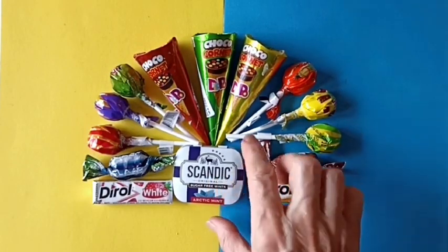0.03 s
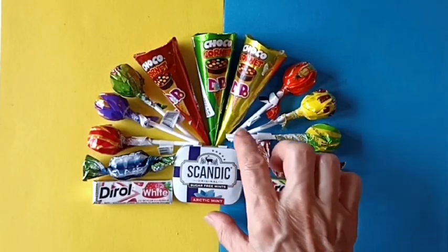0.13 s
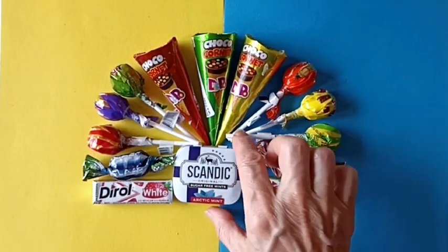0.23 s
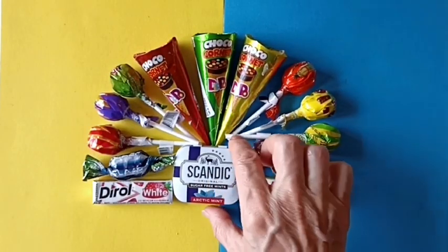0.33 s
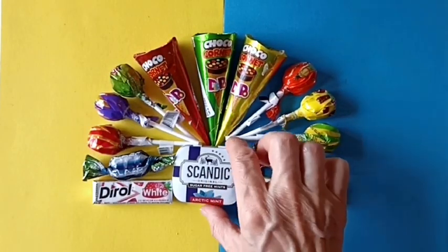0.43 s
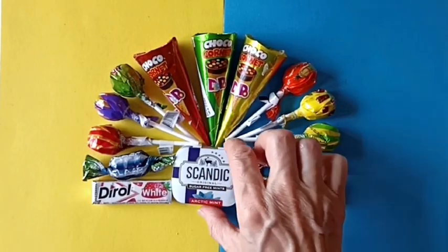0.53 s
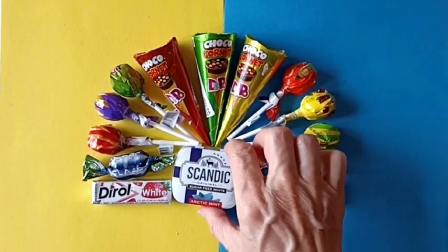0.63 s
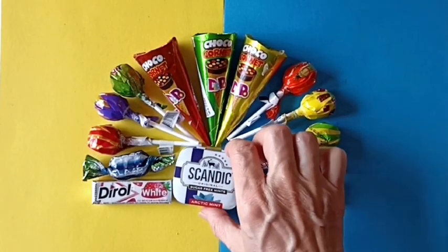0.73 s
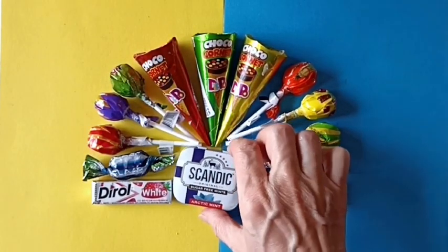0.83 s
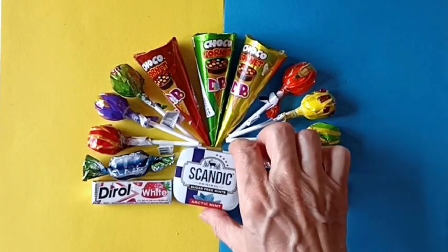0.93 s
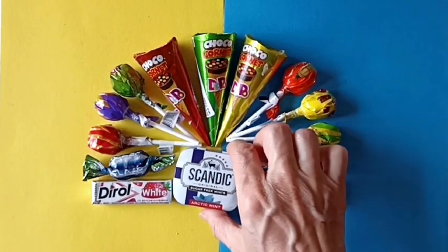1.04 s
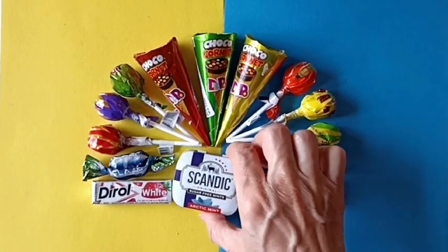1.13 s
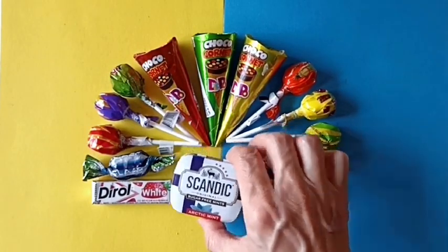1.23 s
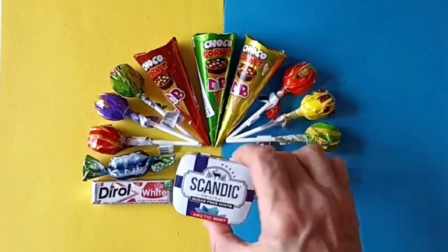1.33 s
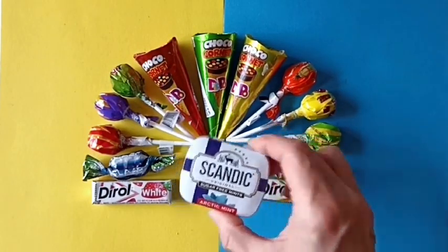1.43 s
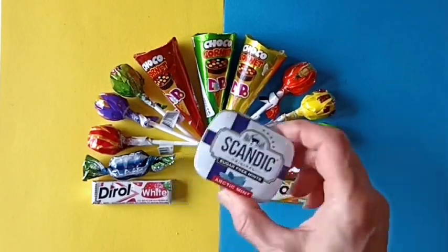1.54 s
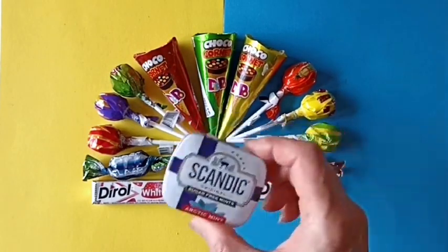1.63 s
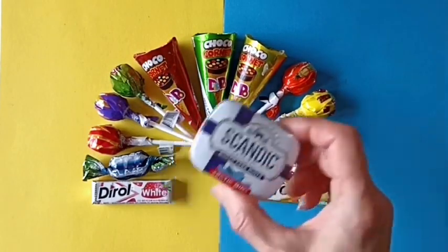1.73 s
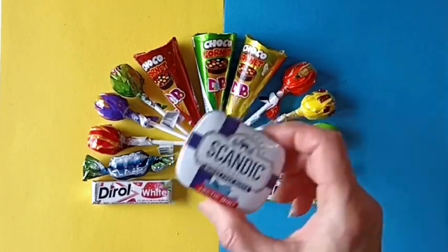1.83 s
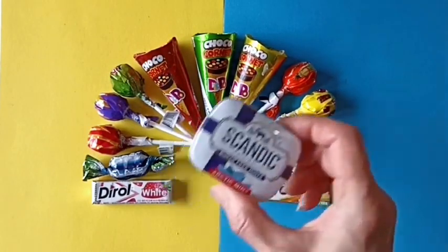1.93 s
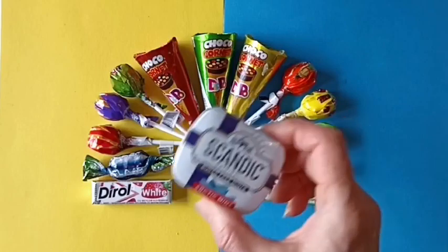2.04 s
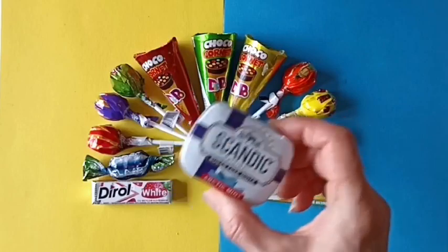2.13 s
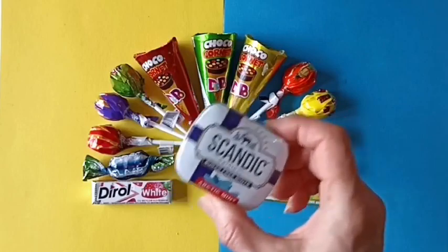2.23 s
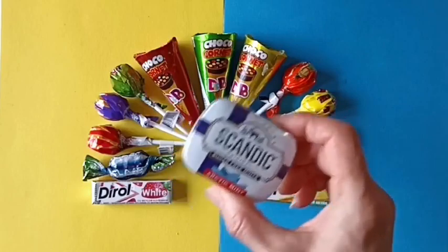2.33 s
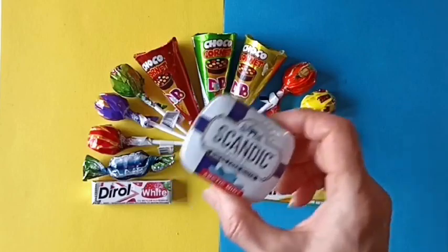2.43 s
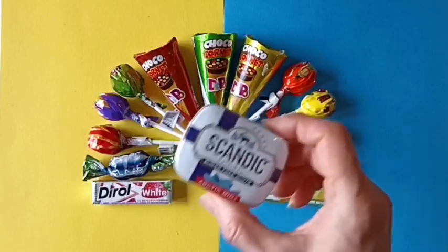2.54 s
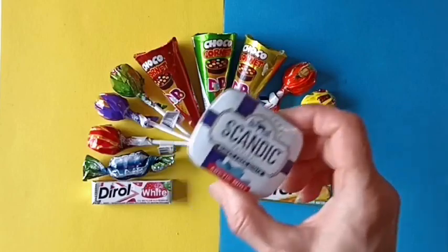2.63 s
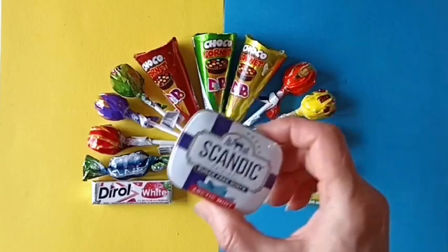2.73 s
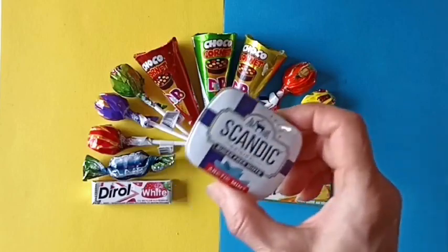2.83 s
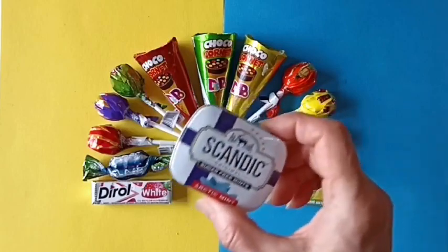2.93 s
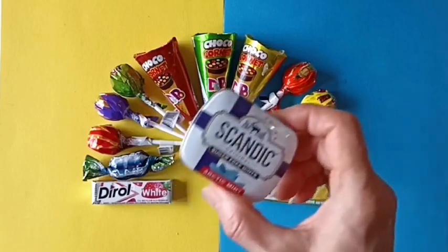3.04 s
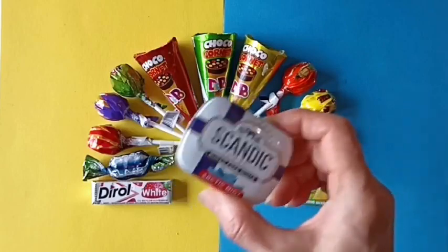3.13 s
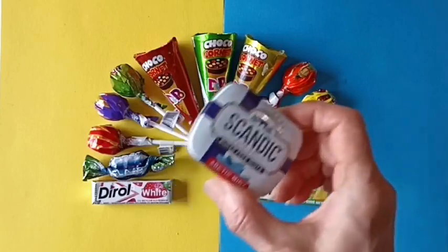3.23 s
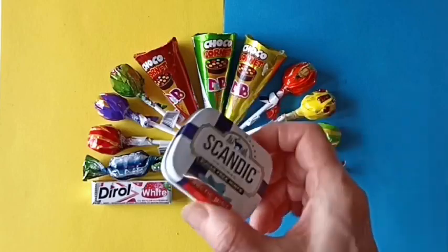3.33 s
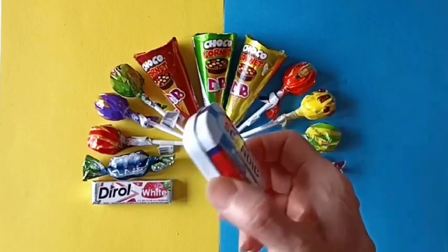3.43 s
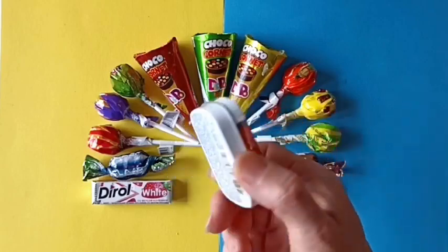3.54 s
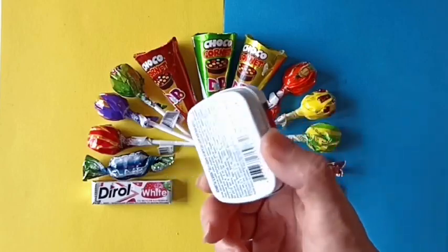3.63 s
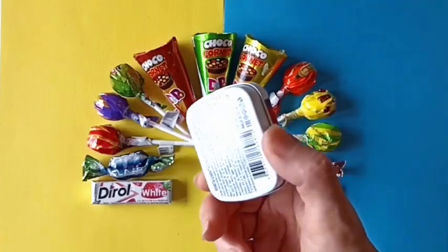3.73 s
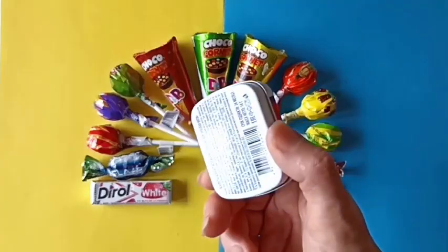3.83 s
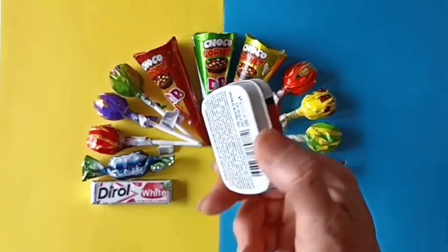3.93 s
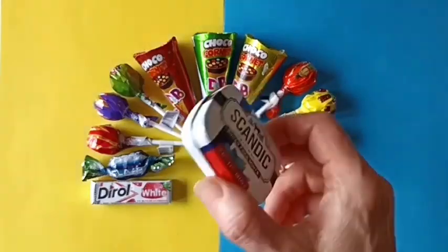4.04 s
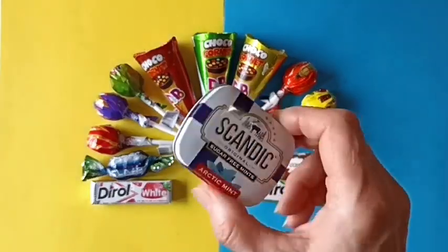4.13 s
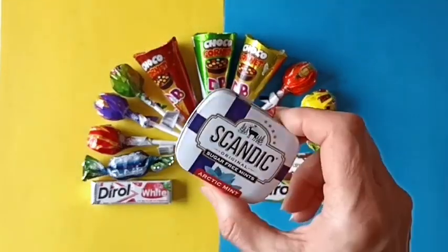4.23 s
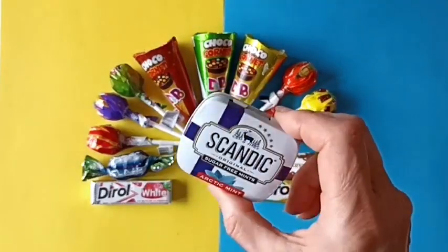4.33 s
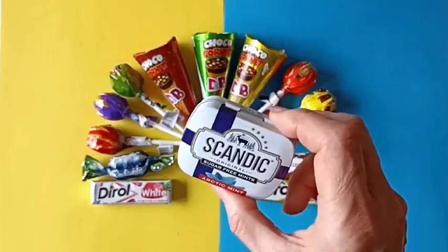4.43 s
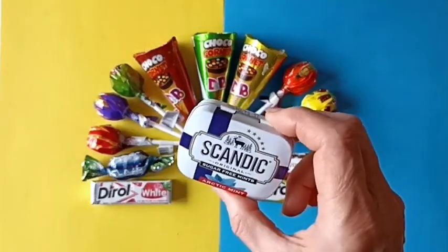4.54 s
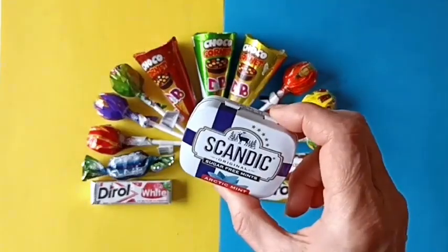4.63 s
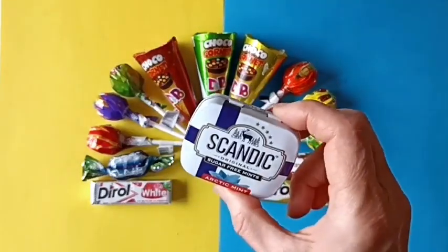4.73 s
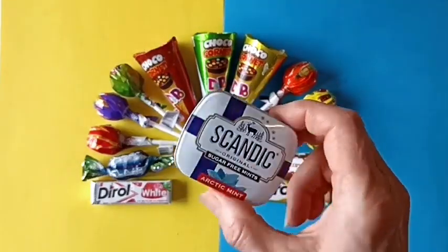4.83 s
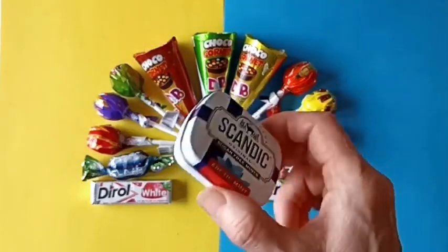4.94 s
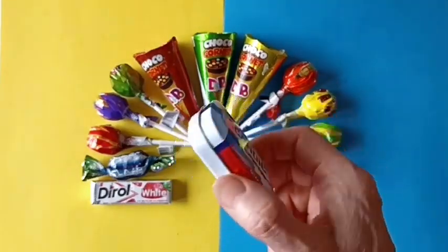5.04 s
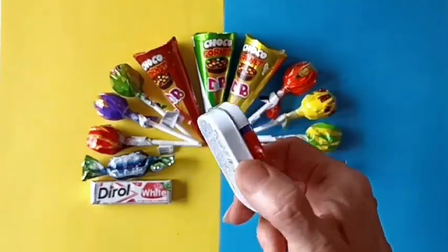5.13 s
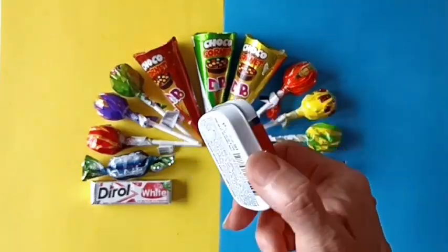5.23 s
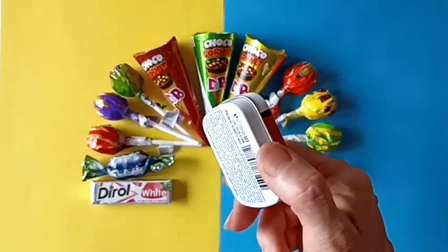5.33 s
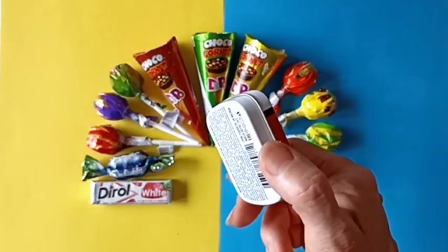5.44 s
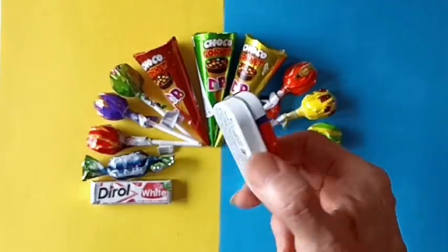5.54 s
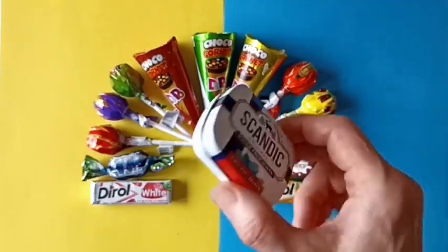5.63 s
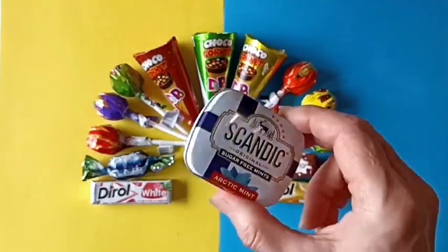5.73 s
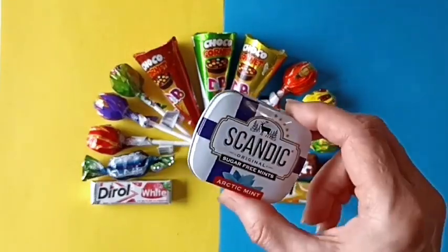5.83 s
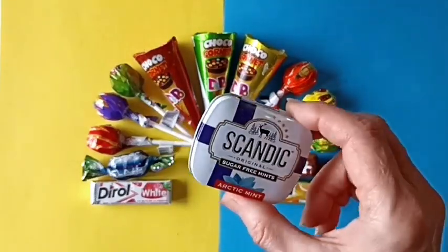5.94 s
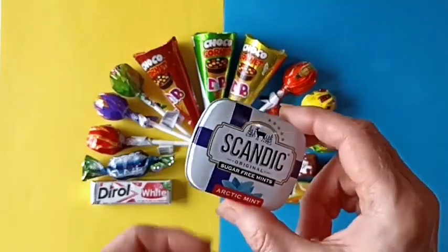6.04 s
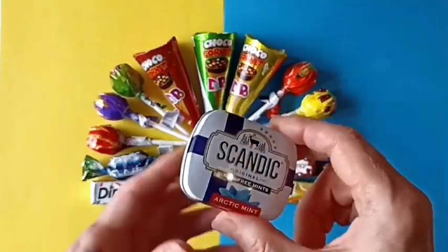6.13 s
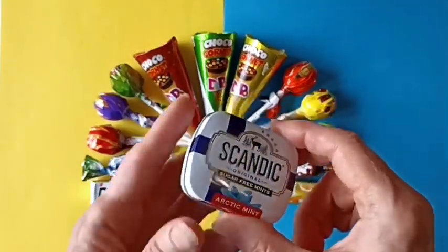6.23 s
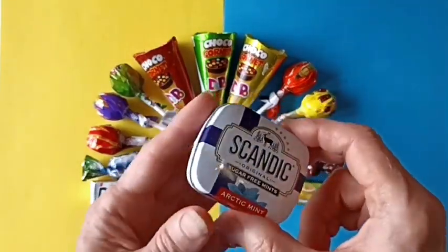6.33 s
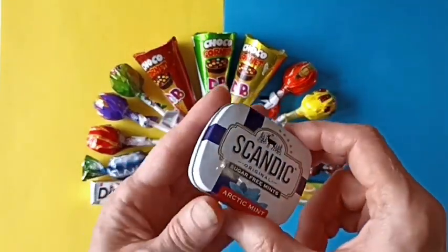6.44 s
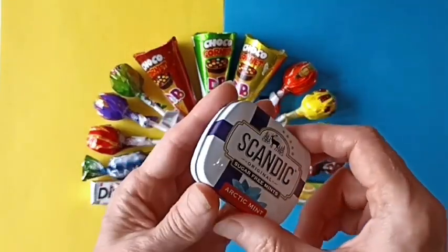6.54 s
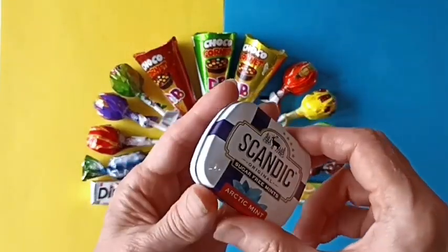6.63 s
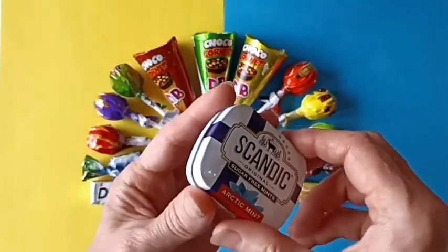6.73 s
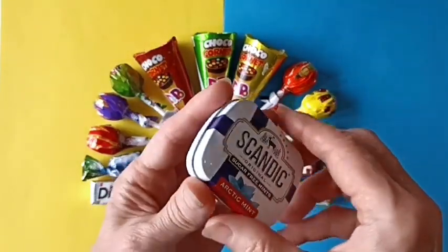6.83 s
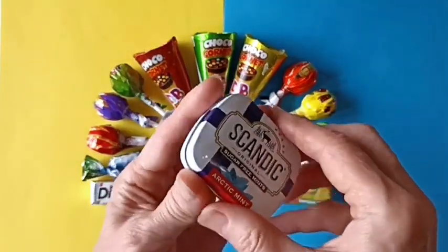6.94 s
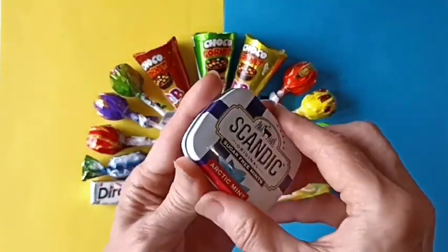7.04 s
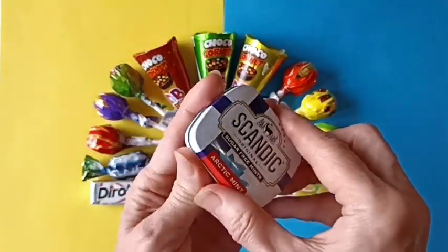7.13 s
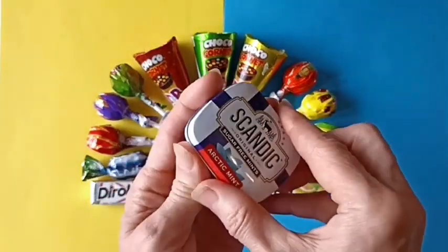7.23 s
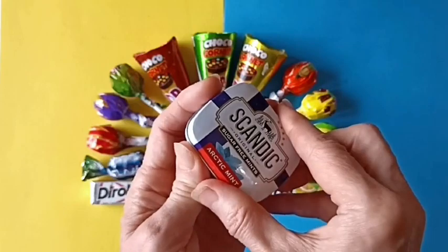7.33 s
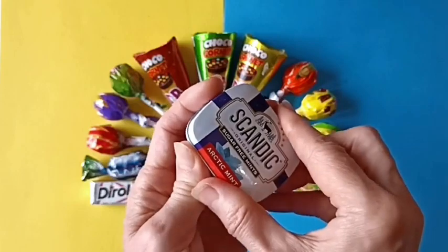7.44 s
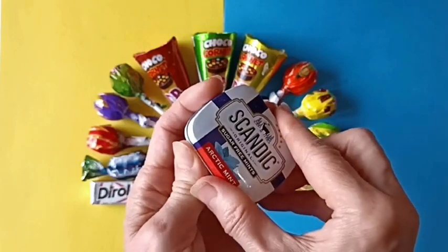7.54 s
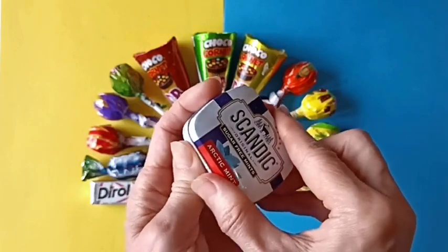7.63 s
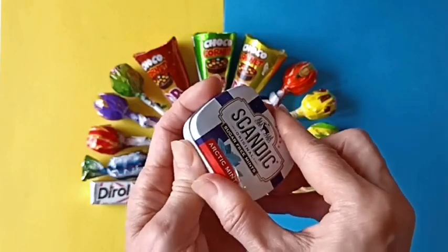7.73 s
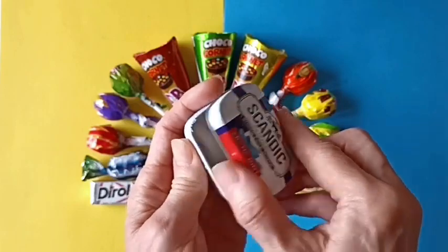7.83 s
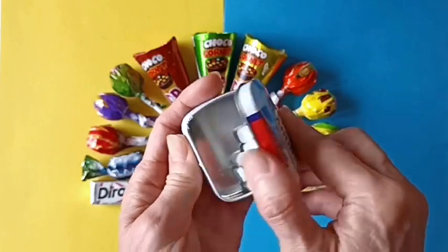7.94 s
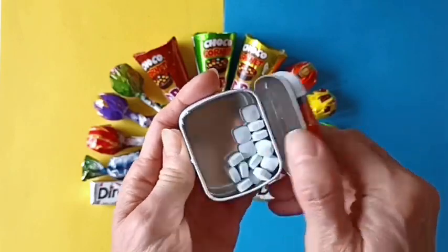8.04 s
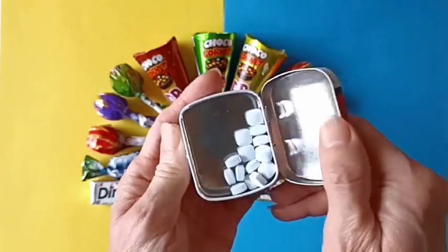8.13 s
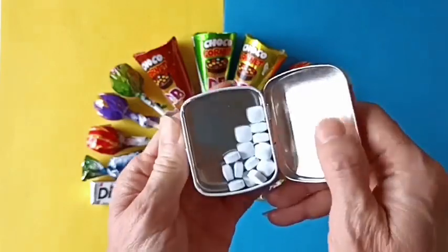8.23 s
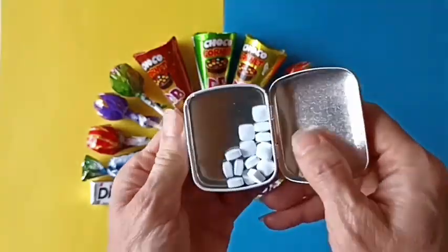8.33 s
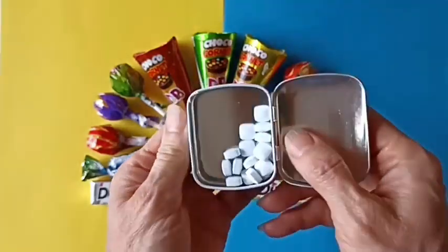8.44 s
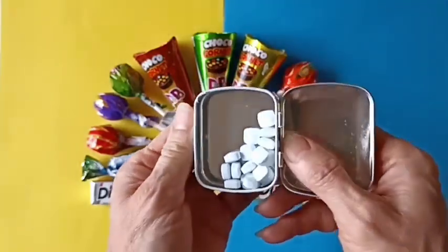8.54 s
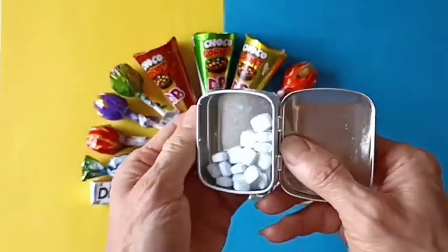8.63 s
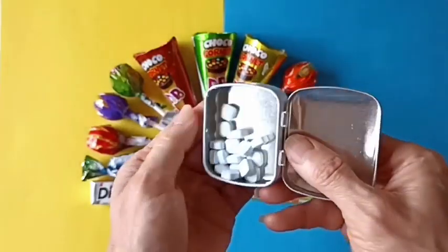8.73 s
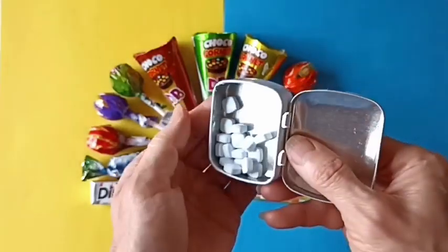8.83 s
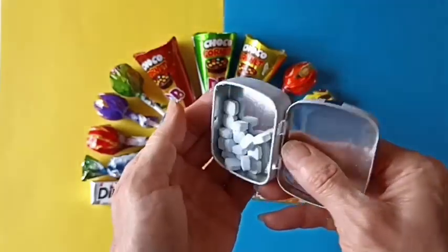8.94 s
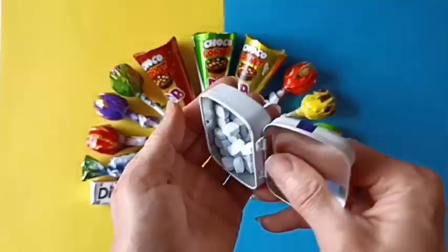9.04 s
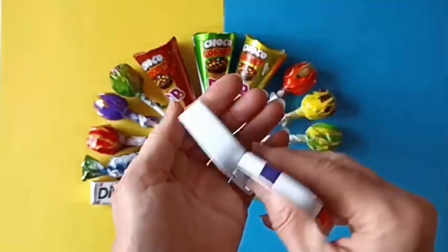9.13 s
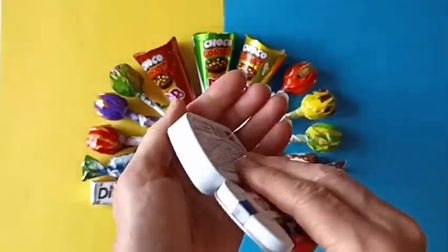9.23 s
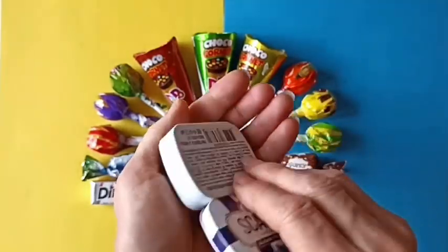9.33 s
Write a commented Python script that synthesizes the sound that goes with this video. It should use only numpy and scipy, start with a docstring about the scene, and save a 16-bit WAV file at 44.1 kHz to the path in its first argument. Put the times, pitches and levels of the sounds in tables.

```python
"""A tin of mints

A small tin of hard mints is lifted from a board, shaken, turned over, popped open and tipped.
Mints land in bunches, strike singly and slide between blows. Each impact excites the modes of the
sheet metal, whose pitch and damping depend on how the tin is held. The lid opens with a puff of air.
The sound reaches two close microphone ports, over the noise and hum of a quiet room."""
import sys
import numpy as np
from scipy import signal
from scipy.fft import rfft, irfft, next_fast_len
from scipy.io import wavfile
from scipy.ndimage import uniform_filter1d

SR = 44100
rng = np.random.default_rng(int(sys.argv[2]) if len(sys.argv) > 2 else 0)


def transcribe(u):
    """Save the signal u as a 16-bit wav file named by the first command-line argument.

    u: samples, shape (n,) or (channels, n), limited to [-1, 1]; the rate is SR.
    q: integer samples, one column per channel.
    """
    v = np.clip(np.atleast_2d(u).T, -1, 1)
    q = np.round(v * 32767).astype(np.int16)
    wavfile.write(sys.argv[1], SR, q)


N = 414540

AIR_SPECTRUM = [(25, -38), (50, -30.5), (95, -7.5), (260, -9), (400, -11.5), (750, -17.5), (1100, -21.5),
                (1600, -24), (4000, -30.5), (10500, -41), (12500, -32), (15500, -42)]  # room noise: f/Hz, relative density/dB
AIR_COHERENCE = [(30, 0.48), (400, 0.16), (8000, 0.074)]  # its likeness left and right: f/Hz, coherence
HUM_LINES = [(98, -81.5), (147, -75), (345, -81.5), (392, -78.5)]  # machine tones: f/Hz, level of the wavering part/dB
ROOM_DECAY = [(400, 0.35), (12000, 0.11)]  # reverberation time: f/Hz, T60/s
PORT_BALANCE = [(950, -0.5), (1900, -3), (3800, -4.5), (7000, -9.5), (9500, -4), (11500, 11), (15000, 10.5)]  # colouring by the ports: f/Hz, left minus right/dB
PORT_COHERENCE = [(300, 0.94), (1500, 0.82), (4000, 0.13)]  # likeness of the ring at both ports: f/Hz, coherence
HAND_DRIFT = [(1.5, 3), (8.5, 1), (9.4, -1)]  # the hands carry the tin from left to right: t/s, left minus right/dB

SHEET_SPECTRUM = [(300, -44.5), (800, -19), (1030, 6), (2000, -6.5), (2750, -0.5), (5500, -6.5),
                  (11100, -8), (12700, -1.5), (14600, -7), (15700, -18.5)]  # countless close modes of the sheet: f/Hz, relative density/dB
SHEET_DECAY = [(500, 0.019), (2000, 0.2), (13000, 0.13)]  # their ring time: f/Hz, T60/s
FACE_BOOM = [(.45, -44.5), (.65, 0.5), (1.3, -8), (1.55, -11.5), (2.15, -6.5), (3.35, -5.5), (3.7, -2),
             (4.2, -1.5), (4.3, 7), (4.45, -6.5), (4.7, 3), (5.2, -5.5), (5.9, 1.5), (6.1, 2), (8.2, -9.5),
             (8.5, -18), (9.4, -35)]  # how freely the flat faces boom as the grip changes: t/s, low-band gain/dB
# Distinct modes of the tin: f/Hz, relative level/dB, T60/s
RESTING_MODES = [(906, 16, 0.02), (2120, 3, 0.012), (2940, 8, 0.008)]  # pressed on the board
SHUT_MODES = [(1009.4, -7.5, 0.23), (1090, 9, 0.021), (2038, 6.5, 0.055), (2766, -5, 0.12),
              (5125, -5.5, 0.035)]  # lid shut
FLIPPED_MODES = [(2097, 6.5, 0.088), (5700, 2.5, 0.09)]  # bottom up, the free face pings
OPEN_MODES = [(897, 17, 0.016), (4710, 9.5, 0.0083), (5890, 10, 0.0095), (2547, 6, 0.019),
              (3304, 12, 0.022)]  # lid open
PALM_MODES = [(1840, 9, 0.027), (1990, -7.5, 0.03)]  # air caught between tin and palm

LID_BRUSHES = [(0.424, 0.486, -56), (0.614, 0.781, -59.5), (0.914, 0.97, -59), (1.045, 1.178, -60),
               (7.17, 7.237, -63), (8.319, 8.35, -52.5)]  # fingertips on the lid: start/s, end/s, level/dB
# Mints sliding, fingers and board rubbing: start/s, end/s, first level/dB, last level/dB
RUB_SPELLS = [(0.618, 1.246, -55, -61.5), (1.335, 1.6, -43.5, -38), (1.667, 3.392, -35.5, -38.5),
              (3.475, 3.527, -30, -35.5), (4.206, 4.554, -44.5, -45.5), (4.992, 5.16, -47.5, -27),
              (5.945, 6.005, -30, -41), (6.477, 6.534, -57, -48), (8.595, 8.718, -49, -39),
              (8.72, 8.94, -32.5, -43), (9.153, 9.4, -41, -47)]
WALL_HITS = [(1.705, -20.5, 0.008), (1.798, -20, 0.0082), (1.904, -20.5, .011), (2.032, -20, 0.013),
             (2.12, -25, 0.0093), (2.231, -20, 0.0096), (2.332, -21, 0.0075), (2.44, -20, 0.0055),
             (2.537, -18, 0.0094), (2.658, -19.5, 0.0076), (2.756, -21, 0.008), (2.872, -20, 0.0074),
             (2.97, -20.5, 0.0061), (3.079, -20, 0.0076), (3.165, -20.5, 0.0072), (3.274, -22, 0.012),
             (3.355, -18, 0.0059), (3.678, -33.5, 0.0092), (3.751, -19, 0.016), (4.19, -20, 0.013),
             (4.352, -39.5, 0.0076), (4.411, -37.5, 0.008), (4.5, -24, .028), (5.138, -28, 0.022),
             (5.311, -30, 0.0062), (5.72, -42, 0.014), (5.942, -29.5, 0.025), (6.03, -37.5, 0.0098),
             (6.094, -39.5, 0.0053), (6.936, -39.5, 0.01), (7.715, -29, 0.007), (8.198, -38.5, 0.0028),
             (8.781, -27.5, 0.01), (9.365, -33.5, 0.0083)]  # handfuls of mints thrown against a wall: t/s, level/dB, scatter/s
SINGLE_HITS = [(0.428, -51, 13), (0.63, -39, -12), (1.1241, -34, -27), (1.508, -35, 6.5),
               (1.5534, -27.5, 1.5), (1.5948, -36, 1.5), (1.793, -18.5, 8.5), (1.879, -18.5, -2),
               (1.904, -10, 1.5), (2.0107, -38, 2), (2.1133, -9, 1), (2.2134, -26, 17), (2.221, -22, -1),
               (2.3219, -11, 0.5), (2.4325, -13, -3), (2.529, -11.5, -24), (2.6478, -24, 2),
               (2.7218, -21, 1), (2.753, -11.5, 1.5), (2.8626, -16.5, 0), (2.9636, -10, 1),
               (3.0665, -30, -2), (3.1319, -20.5, 1), (3.1533, -13.5, -5.5), (3.2587, -23.5, 5),
               (3.3246, -19, 1), (3.343, -11.5, 3), (3.6611, -15.5, -8), (3.678, -14, -1.5),
               (3.727, -16.5, -5), (4.144, -22, -3), (4.167, -14, -6), (4.283, -21, 3), (4.457, -32, 10),
               (4.482, -32, 11), (4.502, -16.5, 2.5), (4.709, -27, -1.5), (4.73, -42, 6.5),
               (5.0866, -27, 6.5), (5.1108, -11, 4), (5.2997, -18.5, -4), (5.7585, -31, 4),
               (5.8388, -14.5, -2), (5.91, -24.5, 3), (5.945, -14.5, 0), (6.4646, -36, -5.5),
               (6.5821, -31.5, 1), (7.633, -48.5, 2.5), (7.676, -37, -15.5), (7.7099, -13, -3),
               (7.765, -27.5, 0), (7.8423, -31.5, -4.5), (7.9164, -30.5, -21), (7.9313, -36, 0.5),
               (8.528, -30, -1.5), (8.649, -32, -7), (8.6987, -26, -3.5), (8.767, -34, 15),
               (8.7825, -16, 5), (8.8674, -15.5, 9), (8.922, -37.5, 17), (9.0063, -45, 12.5),
               (9.035, -44, 7), (9.1718, -34, 6), (9.2571, -27, 2.5), (9.31, -37, 3.5), (9.3338, -27.5, 9),
               (9.358, -31, 6)]  # single mints and finger taps: t/s, level/dB, edge-band gain/dB

LIFT_S, POP_S, SWING_S, TIP_S = 1.5, 7.708, 8.05, 9.1  # tin lifted, lid popped, lid wide, tin tipped
TUMBLE_S, LOOSE_S = (1.66, 6.2), (3.64, 7.5)  # spans: shaken and turned; held lightly by the rim
FLIP_S = 4.0, 5.22, 5.6  # righted, bottom up again, righted again
RING_SAMPLES = 14000
SIDE = np.array([[.5], [-.5]])  # splits a difference between left and right


def gain_of(db):
    """Amplitude ratio: a factor of ten for every 20 dB."""
    return 10 ** (np.asarray(db) / 20)


def at_hz(points, hz):
    """Interpolation of a table on a logarithmic frequency axis."""
    f, value = np.transpose(points)
    return np.interp(np.log(hz + 1), np.log(f + 1), value)


def cohere(a, b, coherence, hz):
    """Partial coherence: the right channel shares a part of the left one's noise."""
    shared = np.clip(at_hz(coherence, hz), 0, 1)[:, None]
    return np.array([a, shared * a + np.sqrt(1 - shared ** 2) * b])


def dying_noise(t60, size, colour=((1, 0), (2, 0))):
    """Modal overlap: dense modes merge into noise, each band decaying exponentially at its own rate."""
    hz, t, (a, b) = signal.stft(rng.standard_normal((2, size)), SR, nperseg=128)
    envelope = gain_of(at_hz(colour, hz)[:, None] - 60 * t / at_hz(t60, hz)[:, None])
    out = signal.istft(cohere(a, b, PORT_COHERENCE, hz) * envelope, SR, nperseg=128)[1][:, :size]
    return out / np.linalg.norm(out[0])


def air(level_db=-61.5, patchy_db=2.5):
    """Ambient noise: a weakly coherent field whose bands flicker slightly in level."""
    frames, hz = N // 512 + 5, np.fft.rfftfreq(2048, 1 / SR)
    a, b, c, d, patches = rng.standard_normal((frames, 1025, 5)).T
    patches = uniform_filter1d(uniform_filter1d(patches, 20, 0), 8, 1)
    envelope = gain_of(at_hz(AIR_SPECTRUM, hz)[:, None] - patchy_db * patches / patches.std())
    spectra = cohere(a + 1j * b, c + 1j * d, AIR_COHERENCE, hz) * envelope
    noise = signal.istft(spectra, nperseg=2048, noverlap=1536)[1][:, :N]
    return gain_of(level_db) * noise / noise.std()


def hum(width_hz=12, steady=2.9):
    """Narrow-band modulation: the tones of a far machine waver in amplitude and phase."""
    t, out = np.arange(N) / SR, 0
    for hz, db in HUM_LINES:
        slow = uniform_filter1d(rng.standard_normal((2, N // 100 + 2)), round(SR / 100 / width_hz))
        a, b = (np.interp(t, np.arange(len(v)) * 100 / SR, v / v.std()) for v in slow)
        phase = 2 * np.pi * hz * t
        out = out + gain_of(db) * ((steady + a) * np.cos(phase) + b * np.sin(phase))
    return out


def room(x, tail_db=-12):
    """Reverberation: a short diffuse tail follows the direct sound, different for each source point."""
    tail = gain_of(tail_db) * np.pad(dying_noise(ROOM_DECAY, size=10000), ((0, 0), (200, 0)))
    return signal.fftconvolve(x, tail + signal.unit_impulse(10200), axes=1)


def lid_pop(level_db=-17.5, hz=329, rise_s=0.001, decay_s=0.0016):
    """Monopole radiation: the lid snaps off and the air puffs; pressure is the derivative of flow."""
    t = np.arange(3000) / SR
    flow = np.sin(2 * np.pi * hz * t) * (1 - np.exp(-t / rise_s)) * np.exp(-t / decay_s)
    pressure = np.gradient(flow)
    puff = room(gain_of(level_db) * np.array([pressure, pressure]) / pressure.max())
    return np.pad(puff, ((0, 0), (round(POP_S * SR), N)))[:, :N]


def radiate(vibration, cutoff_hz=460, left_lead_s=8e-5):
    """Radiation: a small box sends little bass to the ports. Returns boom, body and edge bands."""
    f = np.fft.rfftfreq(16384, 1 / SR)
    delay_s = (.5 - SIDE) * left_lead_s
    ports = gain_of(SIDE * at_hz(PORT_BALANCE, f)) * np.exp(-2j * np.pi * f * delay_s)
    jf = 1j * f / cutoff_hz
    heard = rfft(room(vibration), 16384) * ports * (jf / (1 + jf)) ** 3
    boom = 1 / (1 + (f / 1500) ** 10)
    edge = 1 / (1 + (4300 / (f + 1)) ** 6)
    return irfft(np.array([boom, 1 - boom - edge, edge])[:, None] * heard)[..., :RING_SAMPLES]


def ring(modes, modes_db, slack, spot_db=3.5, lumpy_db=5, tick_s=0.0048, tick_db=10):
    """Impulse response of one spot on the tin: a tick, the dense ring of the sheet and distinct modes."""
    # The grip detunes the sheet a little; slack, lidless walls stray further and ring shorter.
    detune, ring_share = (.07, .74) if slack else (.017, 1)
    t = np.arange(4000) / SR
    hz, db, t60 = np.transpose(modes)[:, :, None]
    hz = hz * (1 + detune * rng.standard_normal(hz.shape))
    envelopes = gain_of(db + spot_db * rng.standard_normal(hz.shape) - 60 * t / t60)
    distinct = (envelopes * np.sin(2 * np.pi * hz * t)).sum(0) / np.sqrt(SR / 100)
    grid_hz = np.geomspace(300, 16000, num=48)  # each spot favours other groups of modes
    colour_db = at_hz(SHEET_SPECTRUM, grid_hz) + lumpy_db * rng.standard_normal(grid_hz.shape)
    sheet = dying_noise(np.array(SHEET_DECAY) * [1, ring_share], len(t), np.transpose([grid_hz, colour_db]))
    tick = 1 + gain_of(tick_db) * np.exp(-t / tick_s)
    return radiate(sheet * tick + gain_of(modes_db) * distinct)


def impacts(t, db, edge_db, late_s, size_db):
    """Impulsive excitation: times, levels by band (boom, body, edge) and a random spot for each blow."""
    tone_db = np.array([np.interp(t, *np.transpose(FACE_BOOM)), 0 * t, edge_db + 0 * t])
    band_db = (db + tone_db)[..., None] + size_db
    return (t[:, None] + late_s).ravel(), band_db.reshape(3, -1), rng.random(late_s.shape).ravel()


def slides(per_s=800, rise_db_per_s=1198, fall_db_per_s=177, patchy_db=3.0):
    """Stick-slip friction: a patter of tiny slips, harder and less even while the tin tumbles."""
    t = np.sort(rng.random(round(per_s * N / SR))) * N / SR
    db = brush_db = -np.inf
    for start, end, first_db, last_db in RUB_SPELLS:
        fade_db = rise_db_per_s * np.maximum(start - t, 0) + fall_db_per_s * np.maximum(t - end, 0)
        db = np.maximum(db, np.interp(t, [start, end], [first_db, last_db]) - fade_db)
    knots_s = np.arange(0, N / SR + 1, .03)  # the slips come in fits and starts
    db = db + patchy_db * np.interp(t, knots_s, rng.standard_normal(knots_s.shape))
    for start, end, level_db in LID_BRUSHES:
        brush_db = np.maximum(brush_db, level_db - rise_db_per_s * abs(t - np.clip(t, start, end)))
    tumbling = (t > TUMBLE_S[0]) & (t < TUMBLE_S[1])
    spread_db = np.where(tumbling, 4.0, 1.5)[:, None]
    size_db = spread_db * np.minimum(rng.exponential(1, (len(t), 1)), 4)
    edge_db = np.maximum(np.where(tumbling, -2, -18), brush_db - db)  # brushing stirs the edges alone
    return impacts(t, db, edge_db, np.zeros_like(size_db), size_db)


def clinks(count=4, blow_db=7, chatter_s=.004, chatter_db=-5):
    """Rebound: one blow, then a chatter of contacts, the later the weaker."""
    rebound = np.arange(count) > 0
    late = rng.exponential(1, (len(SINGLE_HITS), count)) * rebound
    size_db = blow_db + rebound * chatter_db - 3 * late
    return impacts(*np.transpose(SINGLE_HITS), chatter_s * late, size_db)


def bunches(count=40, each_db=-4.0, spread_db=7.5, thinning_db=3.5, front=0.94):
    """Random arrivals: many mints land around one moment, hardest in the thick of it, stragglers lightly."""
    t, db, scatter_s = np.transpose(WALL_HITS)
    late = rng.gamma(4, .5, (len(t), count)) - 1.5
    late = abs(late + front) - front  # folding makes the onset abrupt
    force_db = spread_db * np.minimum(rng.exponential(1, late.shape), 3) / (1 + np.maximum(late, 0))
    size_db = each_db + force_db - thinning_db * abs(late)
    return impacts(t, db, edge_db=0, late_s=1.9 * scatter_s[:, None] * (late - .2), size_db=size_db)


def tin(spots=12):
    """Linear superposition: each impact is convolved with the response of its spot in the current hold."""
    t, band_db, spot = (np.concatenate(v, axis=-1) for v in zip(bunches(), clinks(), slides()))
    polarity = np.where(spot * 100 % 1 < .5, 1, -1)
    blows = gain_of(band_db) * polarity
    onset = np.clip((t * SR).astype(int), 0, N - 1)
    gripped = np.array(SHUT_MODES) * [1, 1, 0.43]  # a firm grip shortens the ring
    tipped = OPEN_MODES[:4] + PALM_MODES
    # Successive holds: modes, their gain over the dense ring/dB
    holds = [(RESTING_MODES, 4.8), (gripped, 0.35), (FLIPPED_MODES, 1.9), (SHUT_MODES, 1.9),
             (FLIPPED_MODES, 1.9), (SHUT_MODES, 1.9), (gripped, 2.6), (OPEN_MODES, 2.3), (tipped, 1.4)]
    hold_of = np.searchsorted([LIFT_S, LOOSE_S[0], *FLIP_S, LOOSE_S[1], SWING_S, TIP_S], t)
    out = np.zeros((2, N))
    for hold, (modes, modes_db) in enumerate(holds):
        now = hold_of == hold
        first, last = onset[now].min(), onset[now].max() + 1
        length = next_fast_len(last - first + RING_SAMPLES)
        spectrum = 0
        for k in range(spots):
            here = now & ((spot * spots).astype(int) == k)
            trains = np.array([np.bincount(onset[here] - first, b[here], last - first) for b in blows])
            response = ring(modes, modes_db, slack=t[now].min() > POP_S)
            spectrum = spectrum + (rfft(trains, length)[:, None] * rfft(response, length)).sum(0)
        part = irfft(spectrum, length)[:, :N - first]
        out[:, first:first + part.shape[1]] += part
    return out


def scene():
    """Sound pressures add: the tin, placed by level difference, its lid and the room's background."""
    drift_db = np.interp(np.arange(N) / SR, *np.transpose(HAND_DRIFT))
    return tin() * gain_of(SIDE * drift_db) + lid_pop() + air() + hum()


def record(dry, cutoff_hz=15900):
    """Band limiting: a linear-phase low-pass removes the highest treble."""
    lowpass = signal.firwin(511, cutoff_hz, window=("kaiser", 9), fs=SR)
    return signal.oaconvolve(dry, lowpass[None], "same")


dry = scene()
out = record(dry)
transcribe(out)
```